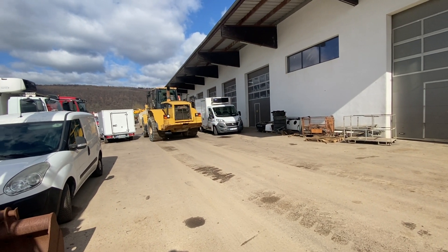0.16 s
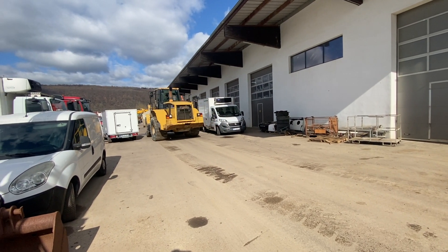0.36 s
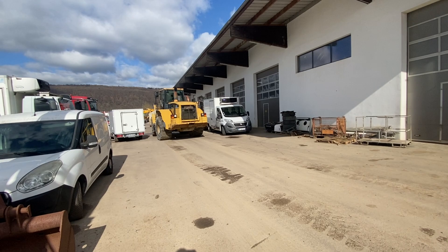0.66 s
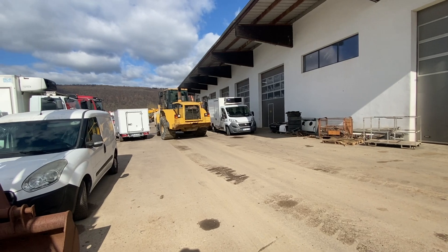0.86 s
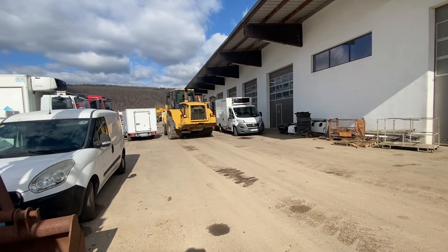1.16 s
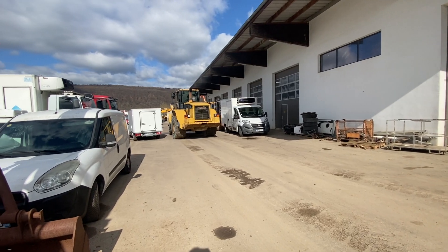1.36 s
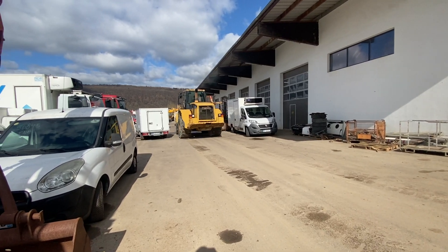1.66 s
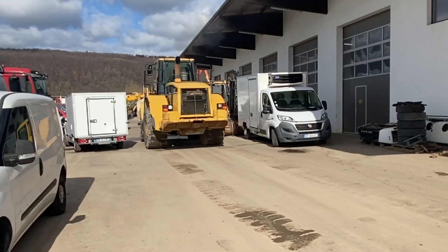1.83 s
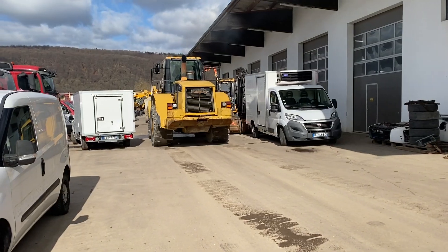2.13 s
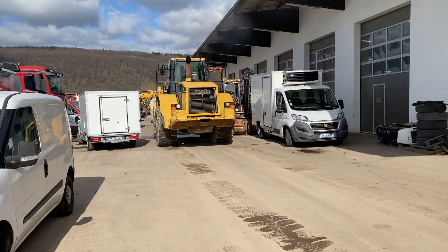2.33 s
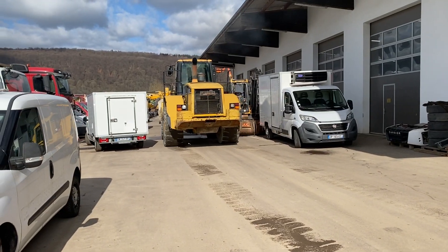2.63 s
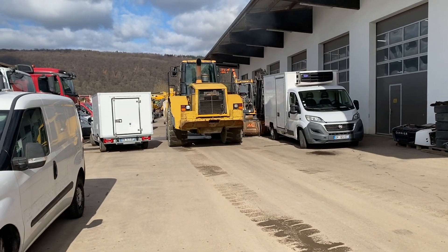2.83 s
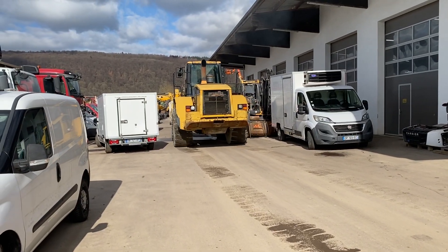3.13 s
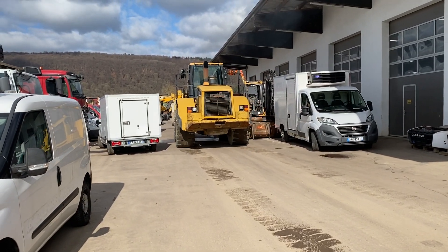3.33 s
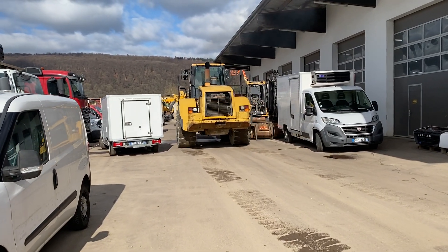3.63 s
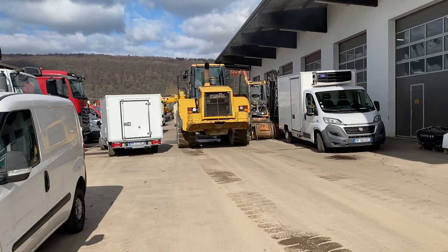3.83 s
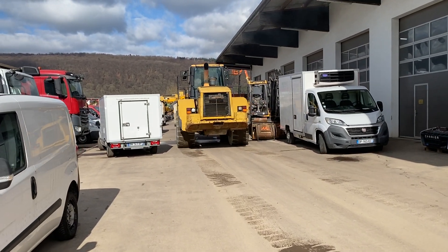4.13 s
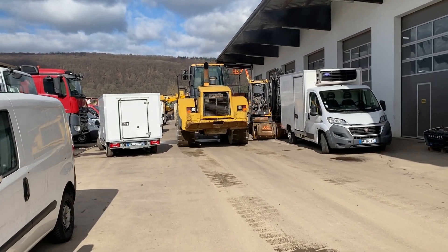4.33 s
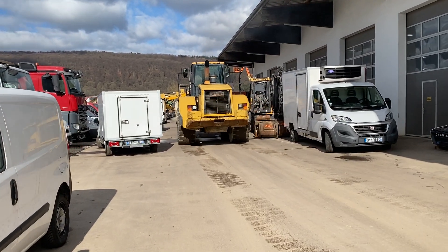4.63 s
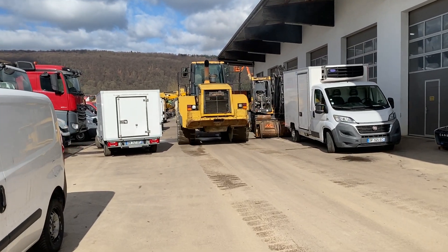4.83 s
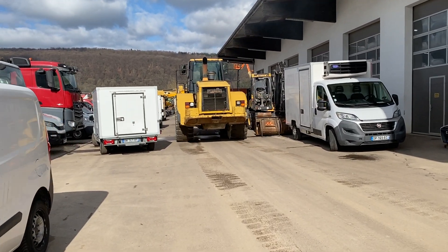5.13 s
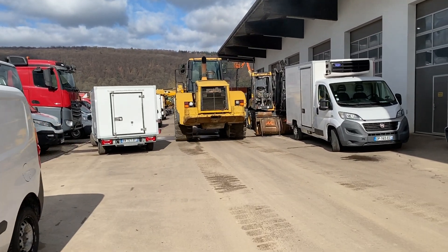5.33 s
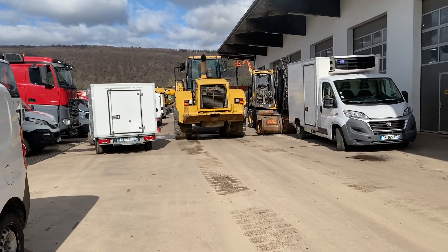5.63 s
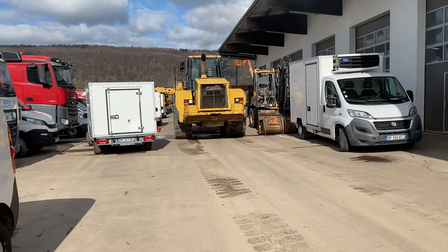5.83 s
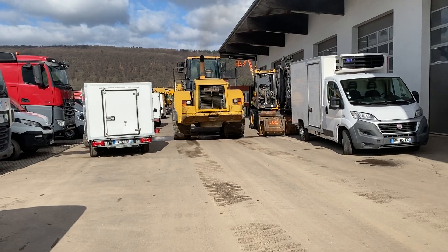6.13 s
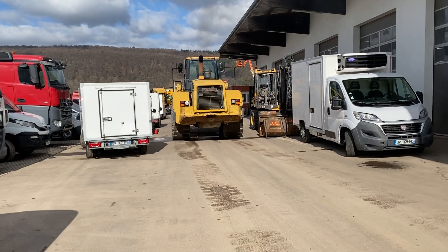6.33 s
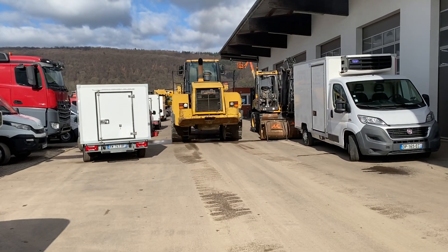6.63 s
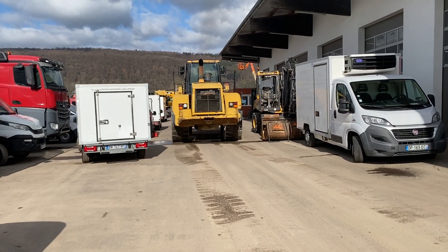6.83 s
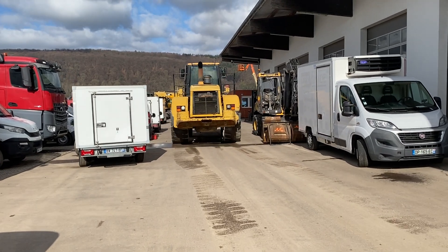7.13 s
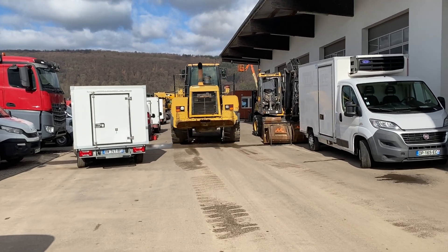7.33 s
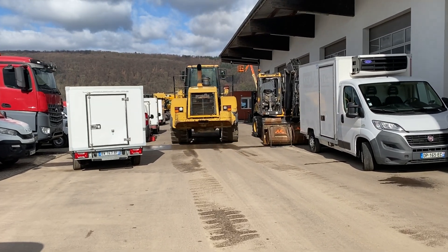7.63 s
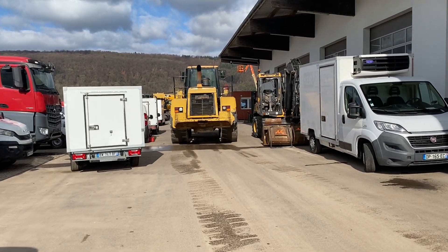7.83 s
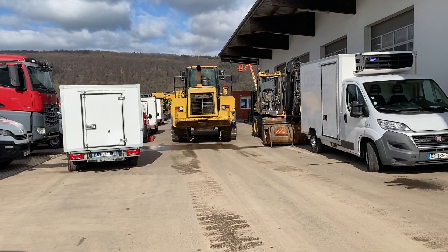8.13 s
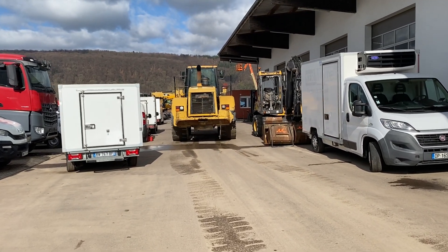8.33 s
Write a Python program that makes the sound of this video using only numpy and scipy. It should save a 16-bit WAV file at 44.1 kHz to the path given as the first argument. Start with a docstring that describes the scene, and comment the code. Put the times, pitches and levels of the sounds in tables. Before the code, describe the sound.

Outdoors, one heavy loader engine fills the whole stretch. It mutters at idle, rises sharply within a second, and holds a droning, lumpy exhaust boom over valve clatter and buzzing loose metal. A high turbo whistle and gear whine ride above. Then a second, stronger rev brings a higher drone, rougher rattle and more hiss, held until the cut. Dry stereo microphone, duller on the right.

```python
"""A wheel loader's six-cylinder diesel in an open yard, heard in stereo.
It idles for 0.5 s, runs up to a hold until 5.3 s, then revs higher to the end.
Uneven cylinders make the exhaust boom throb once an engine cycle, over noise clatter pulsed by the firings.
Gear sines, ringing panels and chinking, buzzing metal join in; the turbo whistle climbs with the revs.
At 1.7 to 1.9 s the microphone zooms in: the right port loses its extra lag and loss."""
import sys
import numpy as np
from scipy import signal
from scipy.fft import rfft, irfft, next_fast_len
from scipy.io import wavfile

SR = 44100
rng = np.random.default_rng(int(sys.argv[2]) if len(sys.argv) > 2 else 0)


def store_wav(level_fs):
    """Save 16-bit WAV to argv[1]."""
    pcm = np.round(np.clip(np.atleast_2d(level_fs), -1, 1) * 32767)
    wavfile.write(sys.argv[1], SR, pcm.T.astype(np.int16))


N = 373968

# Engine speed. Each row: time in seconds, firings per second.
SPEED_FIRINGS_PER_S = [(0, 35.13), (0.56, 37.01), (0.95, 49.42), (1.17, 52.44), (2, 54.28), (2.85, 55.72),
                       (3.5, 55.09), (4.15, 55.48), (5.35, 55.3), (5.7, 65.39), (6, 71.74), (6.3, 74.02),
                       (7.25, 76.15), (7.7, 77.98), (8.48, 78.85)]
# Exhaust level before trim. Each row: time in seconds, firing tone in dB, pipe boom in dB.
EXHAUST_DB = [(0, -32, -37), (0.55, -34, -30.5), (0.82, -16.5, -25.5), (1.1, -18.5, -25.5), (1.7, -23, -25),
              (1.92, -24.5, -16), (2.3, -25, -16), (2.9, -27, -12.5), (3.2, -22, -12), (3.45, -18.5, -12.5),
              (3.9, -18, -11.3), (4.5, -17, -14), (5.3, -15.5, -14), (5.55, -13.5, -10.5), (5.82, -11, -13),
              (5.98, -21, -12), (6.8, -17.5, -12), (7.55, -20, -14.5), (7.8, -17, -15), (8.48, -15.5, -14)]
# Drive of each cylinder on the pipe. Each row: time in seconds, six factors in firing order.
CYLINDER_DRIVE = [(0.5, 0.1, 1.51, 2.1, 2.0, 0.1, 1.8), (1.3, 1.1, 1.28, 0.1, 0.98, 0.1, 1.33),
                  (2.2, 1.43, 0.25, 0.1, 0.96, 1.23, 0.19), (3.8, 1.86, 0.1, 0.94, 0.62, 0.73, 0.24),
                  (5.1, 0.35, 0.1, 0.26, 0.1, 0.14, 0.12), (5.7, 0.1, 1.88, 0.1, 0.9, 1.0, 1.92),
                  (6.6, 0.1, 2.2, 0.1, 1.79, 0.27, 0.41), (7.3, 0.64, 0.14, 0.75, 0.28, 0.64, 0.1),
                  (8.0, 0.1, 0.1, 1.55, 0.55, 1.47, 0.12)]
# Pipe and silencer resonances before heat shift. Each row: frequency in Hz, width in Hz, relative gain in dB.
PIPE_RESONANCES = [(131.3, 17.3, -26.4), (164.8, 28.1, -24.0), (198.3, 21.7, 0.2), (204.1, 27.2, 0.1),
                   (217.5, 22.8, -10.9)]
# Gas heat shifts the pipe resonances. Each row: time in seconds, frequency factor.
PIPE_HEAT = [(0.5, 0.99), (1.3, 0.95), (2.2, 0.98), (3.8, 0.96), (5.1, 0.97), (5.7, 0.95), (6.6, 1.09),
             (7.3, 1.04), (8.0, 1.04)]
# Firing overtones that pass the silencer at low revs. Each row: multiple of the firing rate, level in dB.
OVERTONES_DB = [(2, -34), (4, -37)]
# Engine bay level before trim. Each row: time in seconds, clatter in dB, hiss in dB.
BAY_DB = [(0, -35.5, -45.5), (0.52, -34, -46), (0.8, -30, -39.5), (1.2, -28.5, -41), (1.75, -29.5, -40),
          (2, -27.5, -41), (3.5, -28, -41), (4.8, -29, -42.5), (5.3, -29, -41.5), (5.6, -23.5, -35.5),
          (6.2, -22.5, -34), (7, -23, -36), (7.45, -22.5, -34.5), (8.48, -23.5, -35.5)]
# Clatter spectrum at low, middle and high throttle. Each row: frequency in Hz, relative density in dB per Hz.
CLATTER_LOW_DB = [(200, 8), (270, 1.5), (360, 8), (470, -7), (620, 1), (800, 2.5), (1000, -0.5), (1200, 1),
                  (1450, 0.5), (1900, -5), (2300, -10.5), (2800, -50)]
CLATTER_MID_DB = [(200, 2.5), (270, -7.5), (360, -1), (470, -2.5), (620, 3.5), (800, -2.5), (1000, -1),
                  (1200, -2), (1450, -5.5), (1900, -7.5), (2300, -18.5), (2800, -56.5)]
CLATTER_HIGH_DB = [(200, 9.5), (270, -3), (360, -4.5), (470, -12), (620, -5), (800, -13.5), (1000, -9.5),
                   (1200, -10), (1450, -9.5), (1900, -10.5), (2300, -14.5), (2800, -63)]
# Hiss spectrum at low, middle and high throttle. Each row: frequency in Hz, relative density in dB per Hz.
HISS_LOW_DB = [(1900, -40), (2300, -0.5), (2800, 3.5), (3400, 1.5), (4200, 1.5), (5000, 2), (5900, -2),
               (6800, -10), (7800, -12), (10500, -16.5), (13000, -25), (15500, -29)]
HISS_MID_DB = [(1900, -43), (2300, 3), (2800, -1.5), (3400, -7), (4200, 3.5), (5000, -5), (5900, -8),
               (6800, -22.5), (7800, -24.5), (10500, -18.5), (13000, -22), (15500, -29)]
HISS_HIGH_DB = [(1900, -43.5), (2300, 3), (2800, 1), (3400, 2), (4200, 2), (5000, -2.5), (5900, -8.5),
                (6800, -9.5), (7800, -15), (10500, -16.5), (13000, -25), (15500, -24.5)]
# Block rumble spectrum. Each row: frequency in Hz, relative density in dB per Hz.
RUMBLE_DB = [(15, -18), (30, -15), (55, 2.5), (90, 19), (135, 8.5), (200, -12.5), (260, -16), (400, -41.5)]
# Throttle. Each row: time in seconds, setting (0 low, 1 middle, 2 high).
THROTTLE_SETTING = [(1.7, 0.21), (1.95, 1.68), (5.3, 1.65), (5.7, 2.1)]
# Block rocking on its mounts. Each row: cycles per engine cycle, level in dB re untrimmed clatter.
ROCKING_ORDERS = [(3, -7), (4, -4), (9, -11.5), (15, -8.5)]
# Body panels that ring when an engine order meets them.
# Each row: start in seconds, end in seconds, frequency in Hz, width in Hz, level in dB re untrimmed clatter.
BODY_PANELS = [(6.8, 9, 287, 10, -12), (1.5, 9, 351, 8, -13), (2.3, 4.45, 353, 8, -12),
               (2.1, 3.5, 378, 8, -8), (1.1, 1.7, 316, 10, -12), (1.05, 1.5, 410, 20, -12),
               (3.8, 4.3, 360, 10, -8), (7.2, 8.7, 312, 10, -13), (7.6, 8.7, 420, 12, -15),
               (7.1, 9, 366, 10, -15), (5.7, 7, 412, 12, -18), (5.7, 7, 443, 12, -16),
               (4.4, 5.7, 499, 10, -8), (1.8, 3.4, 552, 14, -17), (7.7, 8.8, 549, 12, -11),
               (.68, .9, 130, 14, -4), (5.9, 8.8, 154, 14, -7), (.7, 1.5, 600, 60, -21),
               (6.3, 6.65, 707, 12, -15), (2, 5.6, 800, 12, -15), (3.45, 3.9, 635, 12, -10),
               (1.8, 5.5, 1129, 10, -19), (.3, 1.2, 543, 10, -18), (.8, 1.35, 735, 40, -20),
               (6.25, 7.3, 892, 12, -23), (6.7, 7.3, 606, 12, -16), (7.15, 7.5, 686, 12, -13),
               (7.4, 7.7, 812, 14, -15), (7.65, 7.95, 590, 12, -11)]
# Engine orders flaring at high revs. Each row: frequency in Hz, level per order in dB re untrimmed clatter.
FLARE_LEVELS = [(240, -24), (330, -20), (480, -26), (600, -23), (780, -26), (1000, -30)]
# Pump gear whine. Each row: time in seconds, level in dB.
GEAR_DB = [(0, -49), (.6, -48), (1, -36), (1.6, -40.5), (2.1, -32), (2.8, -45.5), (3.5, -36.5), (4.4, -42),
           (5.6, -62)]
# Swells of a lower gear hum. Each row: start in seconds, end in seconds, level in dB.
GEAR_HUMS = [(1.85, 2.5, -34.5), (2.3, 4.1, -37.5), (3.797, 5.5, -42.5), (5.583, 5.9, -32.5)]
# Turbo whistle. Each row: time in seconds, level in dB.
TURBO_DB = [(0, -50), (.6, -51), (.68, -46), (.77, -36.5), (.84, -44), (.95, -52), (1.4, -51), (1.85, -49),
            (2.15, -44), (2.45, -43), (2.75, -39), (3, -43), (3.3, -39), (3.6, -38.5), (3.9, -44),
            (4.4, -43), (5.2, -45.5), (5.6, -42.5), (5.9, -40.5), (6.5, -48), (7, -57), (7.6, -62),
            (8.48, -64)]
# Loose metal buzzing. Each row: start in seconds, end in seconds, frequency in Hz, width in Hz, level in dB.
METAL_BUZZES = [(-.2, 1.3, 4200, 250, -51), (.95, 1.8, 3400, 110, -44), (1.7, 2.1, 3400, 110, -40.5),
                (1.9, 3.1, 3430, 70, -48), (2.9, 5.5, 3400, 80, -53), (2.2, 5.4, 4130, 150, -54),
                (5.9, 6.9, 5800, 170, -48), (7.7, 8.7, 5700, 140, -50), (5.9, 6.35, 3630, 110, -42),
                (6.4, 7.5, 3590, 60, -45), (7.9, 8.7, 3490, 60, -44)]
# Chinks of loose metal at set times. Each row: time in seconds, nominal peak in dB, frequency in Hz.
SET_CHINKS = [(.17, -43, 6870), (.922, -37, 6260), (1.156, -43, 6890), (1.606, -46, 6200),
              (1.831, -39, 5900), (2.381, -40, 5860), (2.491, -43, 5870), (2.597, -46, 5980),
              (2.813, -46, 5990), (3.14, -46, 5930), (3.25, -42, 5840), (3.354, -52, 6100),
              (3.572, -51, 6070), (3.898, -42, 6080), (4.655, -36, 5880), (4.98, -47, 5920),
              (5.414, -35, 5900), (5.533, -44, 5890)]
# Shading of the right port. Each row: time in seconds, depth in dB.
SHADING_DB = [(0, 10), (1.7, 12), (1.95, 8.5), (5, 8), (8.48, 8)]
# Spread of the shading over the band. Each row: frequency in Hz, share of the depth.
SHADING_SHARE = [(60, .04), (200, -.03), (400, .02), (700, .15), (1300, .65), (2400, .8), (4400, 1.05),
                 (5600, 1.15), (7000, .65), (8500, 0)]
# Phase of the right port against the left. Each row: frequency in Hz, lag in radians.
PORT_LAG_RAD = [(0, 0), (55, -.06), (200, .07), (375, .2), (620, .55), (860, .9), (1210, 5.2), (2330, 6.8),
                (5770, 7.2), (8400, 3.2), (10200, 0), (12000, -3.1), (13800, -6.3), (15500, -9.3)]
# Likeness of the bay noise at both ports. Each row: frequency in Hz, correlation from 0 to 1.
PORT_LIKENESS = [(200, .96), (320, .96), (640, .92), (1400, .7), (3100, .75), (7000, .78), (10000, .85)]
# Right port before zoom-in. Each row: frequency in Hz, extra lag in radians, extra gain in dB.
WIDE_PORT_RESPONSE = [(55, 0, -.9), (200, .6, -.9), (375, .5, -3), (650, 1.5, -3), (1300, 0, 0)]

CYLINDER_COUNT, GEAR_TEETH, HUM_ORDER = 6, 134, 66
FIRST_KNOCK_CYCLES = .234  # crank position as a share of the engine cycle
WOBBLE_RAD, SILENCER_HZ = .11, 119  # little of the pipe's ring passes below SILENCER_HZ
OVERTONE_FADE_FIRINGS_PER_S = 37, 48
ROCKING_CUT_HZ = 45  # slower rocking hardly radiates
FLARE_SWING_DB, FLARE_RATE_HZ, FLARE_FIRINGS_PER_S = 5, 2.5, (56, 66)
TURBO_BASE_HZ, TURBO_HZ_PER_FLOW, SPOOL_S = 1975, 2595, .78
CRUISE_FIRINGS_PER_S, FLOW_POWER = 55, 2.73
FUELLING_S2_PER_FIRING = .0138  # extra flow share per firing/s gained each second
BREATHY_FIRINGS_PER_S, CLEAR_WIDTH_HZ, BREATHY_WIDTH_HZ = (56, 62), 80, 250
CHINK_HZ, CHINK_DB, CHINK_SPREAD_DB = 5950, -52, 2.5
CHINK_CYCLES, CHINK_T60_S = .89, .14
ZOOM_S, EDGE_HZ = (1.7, 1.9), 15500


def amp(db):
    """Decibels to gain."""
    return 10 ** (np.asarray(db) / 20)


def unit(x):
    """Scales to rms 1."""
    return x / np.sqrt(np.mean(x ** 2) + 1e-20)


def clock():
    """Time of every sample in seconds."""
    return np.arange(N) / SR


def curve(table, axis=1):
    """One column of a time table at every sample."""
    rows = np.asarray(table, float)
    return np.interp(clock(), rows[:, 0], rows[:, axis])


def bins_hz():
    """Frequency of every bin of the whole sound."""
    return np.fft.rfftfreq(next_fast_len(N), 1 / SR)


def spectrum(points):
    """A frequency table at every bin, interpolated on a log axis."""
    hz, value = np.transpose(points)
    return np.interp(np.log(bins_hz() + 1), np.log(hz + 1), value)


def filtered(x, gain):
    """Applies one gain to each bin."""
    size = next_fast_len(N)
    return irfft(rfft(x, size) * gain, size)[:N]


def drift(hz):
    """Smooth noise of rms 1, low-passed near hz."""
    bins = bins_hz()
    return unit(filtered(rng.standard_normal(N), np.exp(-(bins / hz) ** 2) * (bins > 0)))


def slow_drift(hz):
    """Like drift, at every hundredth sample."""
    size = len(clock()[::100])
    bins = np.fft.rfftfreq(size, 100 / SR)
    return unit(irfft(rfft(rng.standard_normal(size)) * np.exp(-(bins / hz) ** 2) * (bins > 0), size))


def swell(start_s, end_s):
    """A flat-topped rise and fall between two times."""
    u = np.clip((clock() - start_s) / (end_s - start_s), 0, 1)
    return np.minimum(1, 5 * np.minimum(u, 1 - u))


def knocks(cycle, depth, decay):
    """A gain of rms 1 that jumps at each firing and decays until the next; decay in firing intervals."""
    since = ((cycle - FIRST_KNOCK_CYCLES) * CYLINDER_COUNT) % 1
    return unit(1 + depth * np.exp(-since / decay))


def whistle(hz, width_hz, steady=1):
    """A tone of rms 1 that follows hz: a steady core inside a breathy skirt."""
    angle = 2 * np.pi * np.cumsum(hz * np.ones(N)) / SR
    return unit((steady + drift(width_hz)) * np.cos(angle) + drift(width_hz) * np.sin(angle))


def exhaust(cycle, wander_db=1.8, tone_trim_db=-0.5, count=37):
    """Six puffs a cycle give the firing tone; their differences give lines that ring the pipe and throb."""
    slow_t, speed = clock()[::100], curve(SPEED_FIRINGS_PER_S)
    times, *drives = np.transpose(CYLINDER_DRIVE)
    pattern = np.fft.fft([np.interp(slow_t, times, d) for d in drives], axis=0)
    # shifting the lines down by the heat factor equals shifting the resonances up
    cold_hz = speed[::100] / CYLINDER_COUNT / np.interp(slow_t, *np.transpose(PIPE_HEAT))
    turn, wave = np.exp(2j * np.pi * cycle), np.ones(N, complex)
    boom, power = np.zeros(N), 0
    for k in range(1, count):
        wave = wave * turn
        line_hz = k * cold_hz
        pipe = 0
        for m, (hz, width_hz, db) in enumerate(PIPE_RESONANCES):
            pipe = pipe + (-1) ** m * amp(db) / (1 + 2j * (line_hz - hz) / width_hz)
        pipe = pipe / np.sqrt(1 + (SILENCER_HZ / line_hz) ** 10)
        wander = amp(wander_db * slow_drift(4)) * np.exp(1j * WOBBLE_RAD * slow_drift(6))
        line = pipe * pattern[k % CYLINDER_COUNT] * wander
        boom += (np.interp(clock(), slow_t, line) * wave).real
        power = power + abs(line) ** 2
    boom /= np.interp(clock(), slow_t, np.sqrt(power))
    firing = 2 * np.pi * CYLINDER_COUNT * cycle
    tone = amp(curve(EXHAUST_DB) + tone_trim_db) * np.cos(firing)
    overtones = sum(amp(db) * np.cos(k * firing) for k, db in OVERTONES_DB)
    overtones = overtones * np.interp(speed, OVERTONE_FADE_FIRINGS_PER_S, [1, 0])
    return np.sqrt(2) * (tone + overtones + amp(curve(EXHAUST_DB, axis=2)) * boom)


def body(cycle, count=100):
    """Low orders rock the block; higher orders ring panels they meet and flare at random at high revs."""
    cycle_hz = curve(SPEED_FIRINGS_PER_S) / CYLINDER_COUNT
    slow_t, slow_hz = clock()[::100], cycle_hz[::100]
    out, turn, wave = np.zeros(N), np.exp(2j * np.pi * cycle), np.ones(N, complex)
    for order, db in ROCKING_ORDERS:
        radiated = 1 / np.sqrt(1 + (ROCKING_CUT_HZ / (order * cycle_hz)) ** 12)
        out += amp(db) * radiated * np.sin(2 * np.pi * (order * cycle + rng.random()))
    panels = [(amp(db) * swell(start_s, end_s)[::100], hz, width_hz)
              for start_s, end_s, hz, width_hz, db in BODY_PANELS]
    load = np.interp(slow_hz * CYLINDER_COUNT, FLARE_FIRINGS_PER_S, [0, 1])
    for k in range(1, count):
        wave *= turn
        order_hz = k * slow_hz
        ring = sum(gain / (1 + (2 * (order_hz - hz) / width_hz) ** 4) for gain, hz, width_hz in panels)
        ring = ring * amp(2.4 * slow_drift(12))
        flare_db = np.interp(order_hz, *np.transpose(FLARE_LEVELS), left=-100, right=-100)
        flare = load * amp(flare_db) * unit(amp(FLARE_SWING_DB * slow_drift(FLARE_RATE_HZ)))
        flare = flare * np.exp(1j * slow_drift(FLARE_RATE_HZ))
        line = (ring + flare) * np.exp(2j * np.pi * rng.random())
        out += (np.interp(clock(), slow_t, line) * wave).real
    return np.sqrt(2) * amp(curve(BAY_DB)) * out


def gears(cycle, flutter_rad=0.39):
    """The pump gear's whine at tooth rate and a lower hum, both locked to the crank."""
    whine = np.sin(2 * np.pi * GEAR_TEETH * cycle + flutter_rad * drift(30))
    whine = amp(curve(GEAR_DB) + 2.5 * drift(5.9)) * whine
    hum_gain = sum(amp(db) * swell(start_s, end_s) for start_s, end_s, db in GEAR_HUMS)
    hum = hum_gain * amp(2.6 * drift(24)) * np.sin(2 * np.pi * HUM_ORDER * cycle)
    return np.sqrt(2) * (whine + hum)


def turbo(cycle):
    """Blade tone pulsed by the firings; pitch lags the flow by inertia and turns breathy at high revs."""
    speed, keep = curve(SPEED_FIRINGS_PER_S), np.exp(-1 / (SPOOL_S * SR))
    fuelling = 1 + FUELLING_S2_PER_FIRING * np.maximum(np.gradient(speed) * SR, 0)
    flow = (speed / CRUISE_FIRINGS_PER_S) ** FLOW_POWER * fuelling
    late_flow = flow[0] + signal.lfilter([1 - keep], [1, -keep], flow - flow[0])
    hz = TURBO_BASE_HZ + TURBO_HZ_PER_FLOW * late_flow
    breathy = np.interp(speed, BREATHY_FIRINGS_PER_S, [0, 1])
    tone = np.sqrt(1 - breathy) * whistle(hz, CLEAR_WIDTH_HZ, steady=1.1)
    tone = tone + np.sqrt(breathy) * whistle(hz, BREATHY_WIDTH_HZ, steady=0.27)
    return amp(curve(TURBO_DB)) * tone * knocks(cycle, depth=1.6, decay=.41)


def loose_metal(cycle):
    """Parts buzz with the firings; chinks ring out at set times, and further chinks, with a common pitch and
    random level, come at the same crank turn each cycle."""
    out = sum(amp(db) * swell(start_s, end_s) * whistle(hz, width_hz)
              for start_s, end_s, hz, width_hz, db in METAL_BUZZES)
    out = out * knocks(cycle, depth=1.4, decay=0.24)
    t = np.arange(SR // 10) / SR
    times_s = clock()[1:][np.diff(np.floor(cycle - CHINK_CYCLES)) > 0]
    faint = [(s, CHINK_DB + CHINK_SPREAD_DB * rng.standard_normal(), CHINK_HZ) for s in times_s]
    for s, db, hz in [*SET_CHINKS, *faint]:
        detunings = 1 + .016 * rng.standard_normal(6)
        ring = sum(np.sin(2 * np.pi * hz * f * t) for f in detunings) / 4
        envelope = amp(db - 60 * t / CHINK_T60_S) * (1 - np.exp(-t / 0.00026))
        part = out[int(s * SR):][:len(t)]
        part += (ring * envelope)[:len(part)]
    return out


def repeating(cycle, renew_s, size=1024):
    """A random rattle pattern that comes back every engine cycle and slowly changes."""
    age = clock() / renew_s
    patterns = rng.standard_normal((48, size))
    row, at, blend = age.astype(int), cycle % 1 * size, age % 1 * np.pi / 2
    col, part = at.astype(int), at % 1
    old, new = (patterns[r, col] * (1 - part) + patterns[r, (col + 1) % size] * part for r in (row, row + 1))
    return unit(old * np.cos(blend) + new * np.sin(blend))


def by_throttle(x, spectra, band_hz):
    """Colours x with spectra crossfaded by the throttle setting."""
    setting, hz = curve(THROTTLE_SETTING), bins_hz() + 1
    edges = 1 / np.sqrt((1 + (band_hz[0] / hz) ** 12) * (1 + (hz / band_hz[1]) ** 12))
    out = 0
    for k, points in enumerate(spectra):
        share = np.maximum(1 - abs(setting - k), 0)
        out = out + share * unit(filtered(x, amp(spectrum(points)) * edges))
    return out


def bay(cycle, clatter_trim_db=2.0, hiss_trim_db=2.5, rumble_trim_db=-15):
    """Valve and piston clatter, the hiss of injection and fan, and a low rumble, all shaped noise."""
    share = np.interp(curve(SPEED_FIRINGS_PER_S), FLARE_FIRINGS_PER_S, [.4, .22])  # power that repeats
    rattle = np.sqrt(share) * repeating(cycle, renew_s=0.7826) + np.sqrt(1 - share) * rng.standard_normal(N)
    rattle = rattle * knocks(cycle, depth=0.37, decay=0.33)
    clatter = by_throttle(rattle, (CLATTER_LOW_DB, CLATTER_MID_DB, CLATTER_HIGH_DB), (230, 2400))
    fizz = rng.standard_normal(N) * knocks(cycle, depth=0.47, decay=0.24) * amp(0.5 * drift(15))
    hiss = by_throttle(fizz, (HISS_LOW_DB, HISS_MID_DB, HISS_HIGH_DB), (2100, 20000))
    rumble = unit(filtered(rng.standard_normal(N), amp(spectrum(RUMBLE_DB))))
    block = amp(curve(BAY_DB)) * (amp(clatter_trim_db) * clatter + amp(rumble_trim_db) * rumble)
    return block + amp(curve(BAY_DB, axis=2) + hiss_trim_db) * hiss


def scene():
    """The engine at the left port; the right hears it shaded, phase-shifted and mixed with other reflections."""
    cycle = np.cumsum(curve(SPEED_FIRINGS_PER_S)) / SR / CYLINDER_COUNT
    tones = exhaust(cycle) + body(cycle) + gears(cycle) + turbo(cycle) + loose_metal(cycle)
    noise, like = bay(cycle), np.clip(spectrum(PORT_LIKENESS), 0, 1)
    right_noise = filtered(noise, like) + filtered(bay(cycle), np.sqrt(1 - like ** 2))
    right = filtered(tones + right_noise, np.exp(-1j * spectrum(PORT_LAG_RAD)))

    wide_hz, lag_rad, gain_db = np.transpose(WIDE_PORT_RESPONSE)
    wide_gain = amp(spectrum(np.c_[wide_hz, gain_db]))
    wide = filtered(right, wide_gain * np.exp(-1j * spectrum(np.c_[wide_hz, lag_rad])))
    right = right + np.interp(clock(), ZOOM_S, [1, 0]) * (wide - right)

    # crossfade between the lightest and the deepest shading
    shade_db = curve(SHADING_DB)
    least, most = (filtered(right, amp(-db * spectrum(SHADING_SHARE))) for db in (shade_db.min(), shade_db.max()))
    blend = (shade_db - shade_db.min()) / np.ptp(shade_db)
    return np.array([tones + noise, least + blend * (most - least)])


def record(dry):
    """The recorder rounds the highest peaks, then limits the band."""
    rounded = dry / (1 + abs(dry / .95) ** 10) ** (1 / 10)
    lowpass = signal.firwin(511, EDGE_HZ, window=("kaiser", 9), fs=SR)
    return signal.oaconvolve(rounded, lowpass[None], "same")


dry = scene()
out = record(dry)
store_wav(out)
```